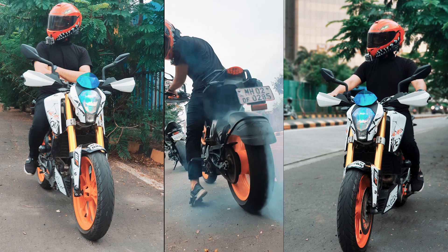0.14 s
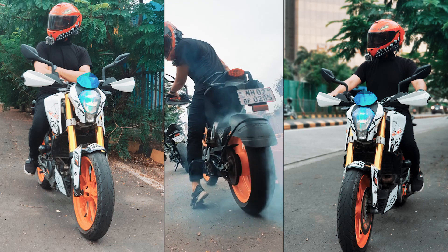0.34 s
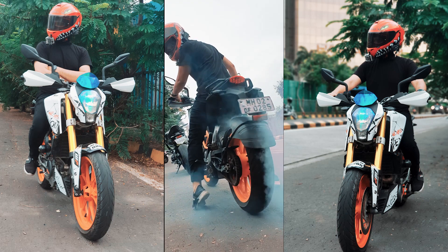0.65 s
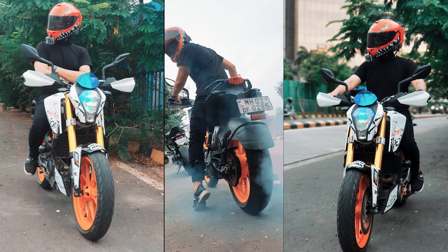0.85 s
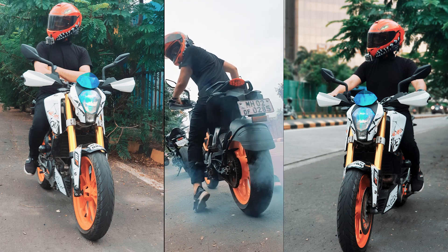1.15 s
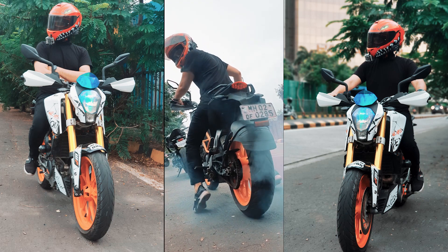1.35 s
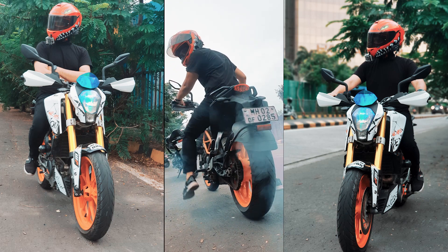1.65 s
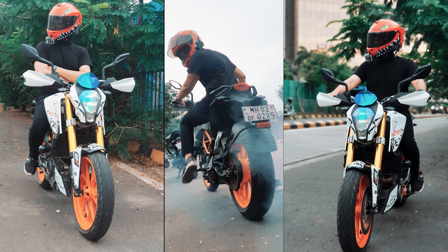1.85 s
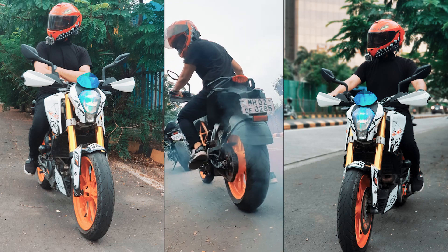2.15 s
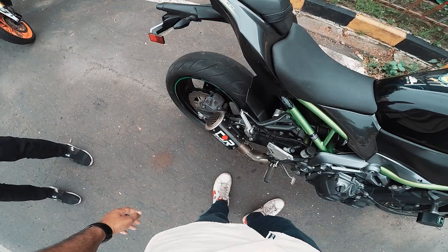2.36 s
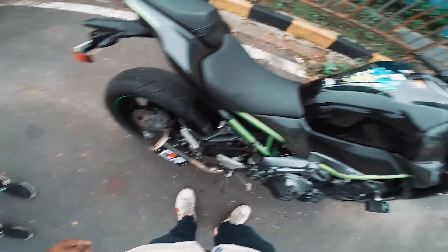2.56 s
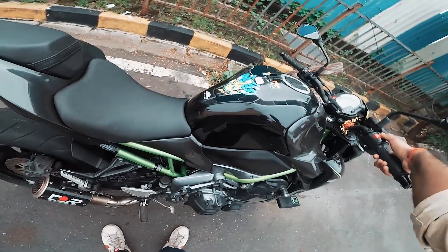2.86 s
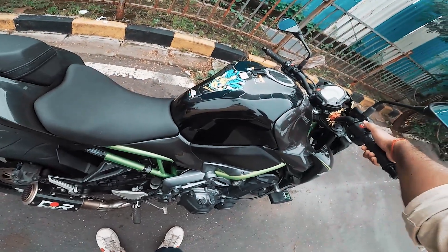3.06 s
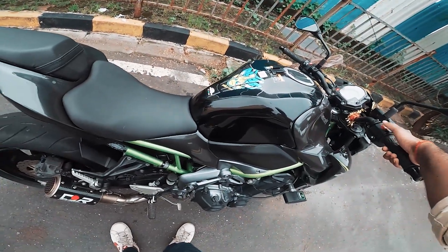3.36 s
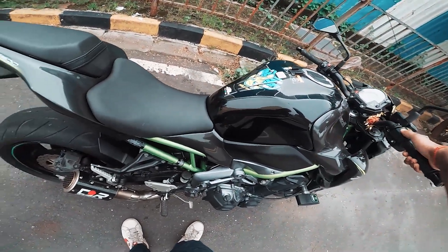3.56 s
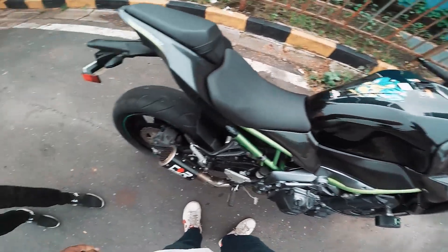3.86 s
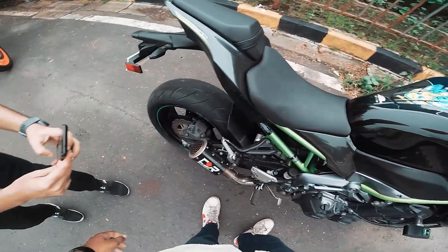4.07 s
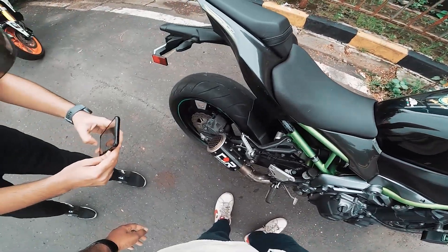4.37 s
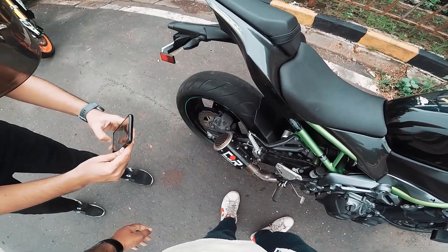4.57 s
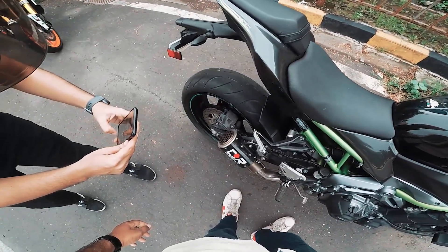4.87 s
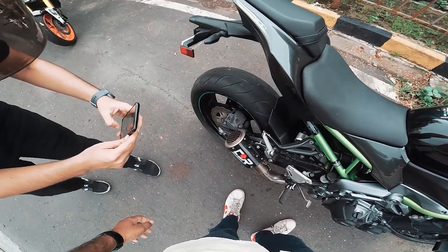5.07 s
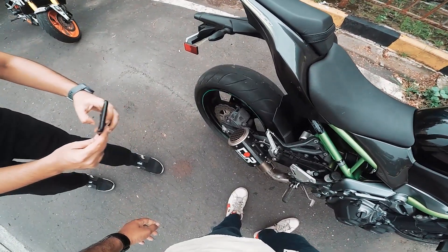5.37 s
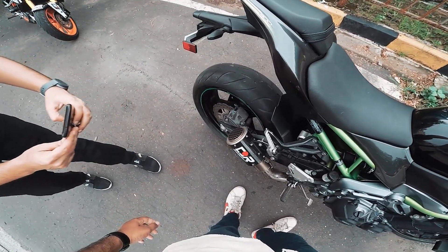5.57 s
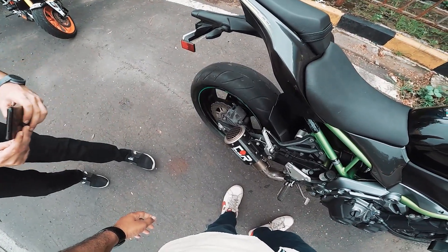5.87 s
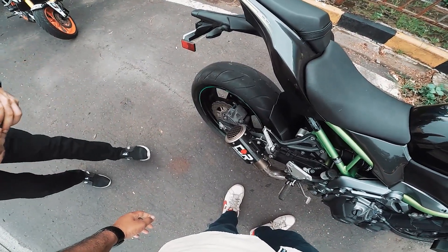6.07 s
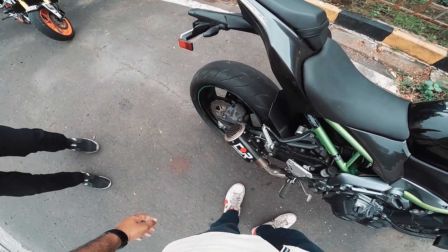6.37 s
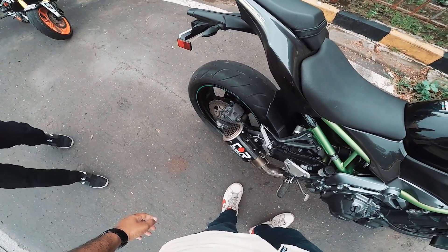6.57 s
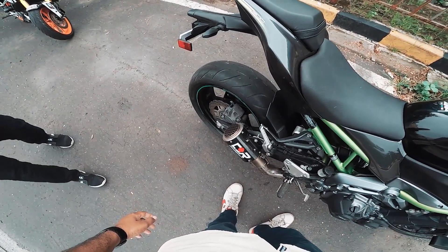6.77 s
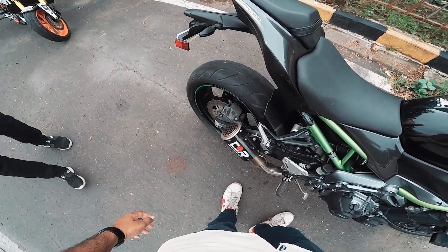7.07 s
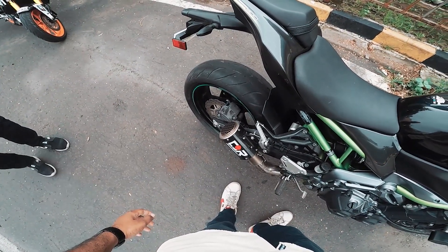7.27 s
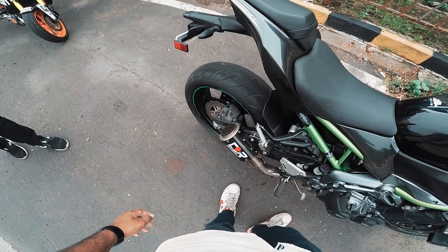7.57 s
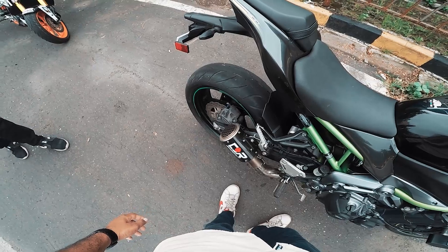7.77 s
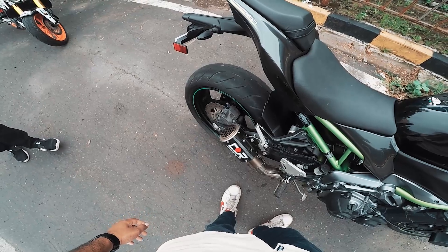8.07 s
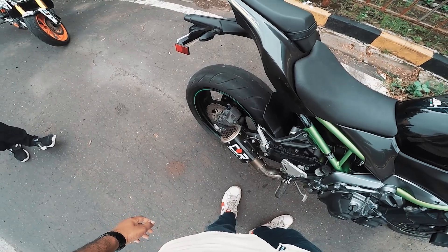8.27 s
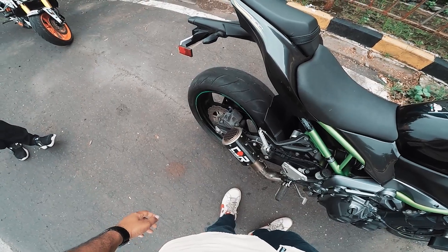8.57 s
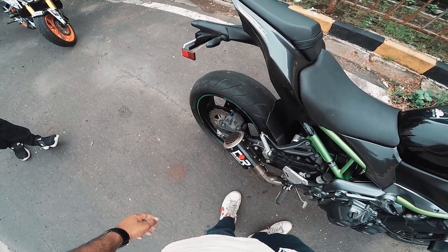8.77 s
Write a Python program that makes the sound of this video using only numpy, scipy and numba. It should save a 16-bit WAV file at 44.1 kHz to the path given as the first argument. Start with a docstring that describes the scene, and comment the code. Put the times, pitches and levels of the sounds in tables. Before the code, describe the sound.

Outdoors by a road with soft traffic, a single-cylinder motorcycle blares in a burnout with rough tyre scrub, pops once, slows into separate thuds and stops among a few clanks. An abrupt change to a close view brings switch clicks, a whining starter that labours, then a four-cylinder engine catching, idling unevenly and revving three times, each higher, coasting down between.

```python
"""By a road, two motorcycles are heard one after the other, with soft traffic noise behind each.
A single-cylinder bike spins its rear tyre in a burnout, runs down and stops with a few clanks.
Then, close up, a four-cylinder bike is switched on, cranked, idles unevenly and is revved three times, each higher.
Each firing is a pulse that rings an exhaust pipe; shaped noise adds tyre scrub, gas rasp and traffic.
Short pulses and bursts ring metal parts for the valves, the starter gears and the switches."""
import sys
import numpy as np
from scipy import signal
from scipy.fft import rfft, irfft
from scipy.io import wavfile
from scipy.ndimage import uniform_filter1d, minimum_filter1d
from numba import njit

SR = 44100
rng = np.random.default_rng(int(sys.argv[2]) if len(sys.argv) > 2 else 0)


def bounce(signal):
    """Save signal as a 16-bit WAV file at the path given by the first command-line argument."""
    frames = np.transpose(np.atleast_2d(signal))
    limited = np.clip(frames, -1, 1)
    pcm = np.round(limited * 32767).astype(np.int16)
    wavfile.write(sys.argv[1], SR, pcm)


N = 393372
T = np.arange(N) / SR  # time of every sample, in seconds


def undb(db):
    """Decibels to gain."""
    return 10 ** (np.asarray(db) / 20)


def look_up(x, table):
    """Read a two-column table at x, with straight lines between its rows."""
    return np.interp(x, *np.transpose(table))


def between(start, end, fade):
    """One from start to end, with short slopes just inside both ends."""
    return np.clip((T - start) / fade, 0, 1) * np.clip((end - T) / fade, 0, 1)


def bump(s, length):
    """A brief swell to one around a moment."""
    return np.exp(-((T - s) / length) ** 2)


def since(s):
    """Seconds since a moment, zero before it."""
    return np.maximum(T - s, 0)


def ramp(s, length):
    """Rises from zero at s to one."""
    return np.minimum(since(s) / length, 1)


def blend(a, b, share):
    """From a to b as the share goes from zero to one."""
    return a + (b - a) * share


def colour(x, points):
    """Ring x through a body with this (frequency, level) response; nothing sounds before it is struck."""
    hz, db = np.transpose(points)
    octave = np.log2(np.maximum(np.arange(4097) * SR / 8192, 1))
    below = np.maximum(np.log2(hz[0]) - octave, 0)
    above = np.maximum(octave - np.log2(hz[-1]), 0)
    # beyond the table the level falls 18 dB per octave
    level_db = np.interp(octave, np.log2(hz), db) - 18 * (below + above)
    # folding the cepstrum (the spectrum of the log level) puts the ringing after the blow
    cepstrum = irfft(np.log(undb(level_db)))
    response = irfft(np.exp(rfft(2 * cepstrum * (np.arange(8192) < 4096))))[:4096]
    response = response / np.linalg.norm(response)
    response = response.reshape((1,) * (x.ndim - 1) + (-1,))
    return signal.oaconvolve(x, response, axes=-1)[..., :N]


def steady(x, size=4000):
    """Even out the loudness by bringing the running rms (average strength) to about one."""
    power = np.mean(np.atleast_2d(x) ** 2, axis=0)
    power = uniform_filter1d(uniform_filter1d(power, size), size)
    return x / np.sqrt(np.abs(power) + 1e-4 * power.mean())


def noise(width):
    """Stereo noise; width is side over mid, and zero is the same at both ears."""
    mid, side = rng.standard_normal((2, N))
    return (mid + width * side * np.array([[1], [-1]])) / np.sqrt(1 + width ** 2)


def walk(rate):
    """Slow random wandering around zero, with a spread near one."""
    k = int(SR / rate)
    steps = np.repeat(rng.standard_normal(N // k + 1), k)
    return 1.3 * uniform_filter1d(steps, k)[:N]


def pan(db):
    """Left and right gains for a left minus right level."""
    return undb(np.array([[db], [-db]]) / 2)


def turns(rate, start):
    """Cycles counted from a starting moment."""
    return np.cumsum(rate * (T >= start)) / SR


def firings(cycle, scatter_db, jitter_s, pattern_db=(0,)):
    """One pulse a cycle, uneven in size and moment; the pattern gives successive pulses their own strength."""
    at = np.flatnonzero(np.diff(np.floor(cycle)) > 0)
    chance = rng.standard_normal((len(at), 2))
    size = undb((scatter_db + 0 * T)[at] * chance[:, 0] + np.resize(pattern_db, len(at)))
    shift = np.round((jitter_s + 0 * T)[at] * SR * chance[:, 1]).astype(int)
    return np.bincount(np.clip(at + shift, 0, N - 1), size, N)


def scatter(x, wet, t60):
    """Ground, kerb and bodywork return a short noisy tail, different at each ear; t60 is its 60 dB fall [s]."""
    t = T[:SR // 3]
    tail = rng.standard_normal((2, len(t))) * undb(-60 * t / t60)
    tail /= np.linalg.norm(tail, axis=1, keepdims=True)
    return x + wet * signal.oaconvolve(np.atleast_2d(x) * np.ones((2, 1)), tail, axes=1)[:, :N]


@njit
def lowpass(x, hz, damping):
    """Low-pass filter with a moving corner; less damping makes the corner ring more."""
    y, b, l = np.empty(len(x)), 0., 0.
    for i in range(len(x)):
        g = np.tan(np.pi * hz[i] / SR)
        v = (b + g * (x[i] + 1e-18 - l)) / (1 + g * (g + damping))
        y[i] = l + g * v
        b, l = 2 * v - b, 2 * y[i] - l
    return y


def road(spectrum):
    """Traffic noise: the rumble is alike at both ears, the hiss wide."""
    rumble = lowpass(rng.standard_normal(N), 500 + 0 * T, 1.2)
    side = rng.standard_normal(N)
    side = side - 1.16 * lowpass(side, 1500 + 0 * T, 1.0)
    wide_hiss = side * np.array([[1], [-1]])
    mix = noise(0) + 0.42 * rumble * walk(14) + 0.81 * wide_hiss
    return steady(colour(mix, spectrum), size=20000)


# loudness of the traffic: (time [s], level [dB])
TRAFFIC = [(1.7, -41.5), (2.1, -39), (2.42, -33.5), (2.72, -30.5), (2.95, -34), (4.06, -34.5), (6.3, -40)]
# tone of the road behind the first bike: (frequency [Hz], relative level [dB])
FAR_ROAD = [(18, -31), (30, -16), (80, -8), (424, -24), (521, -17.5), (624, -28.5), (1130, -23.5),
            (1610, -36), (2770, -34), (3150, -38), (14000, -68)]
# tone of the road behind the second bike: (frequency [Hz], relative level [dB])
NEAR_ROAD = [(18, -38), (30, -17), (117, -13), (156, -1), (363, -9), (521, -13.5), (608, -17.5),
             (1100, -22), (1570, -25), (2560, -34.5), (6150, -34.5), (14000, -53.5)]
CHANGE_S = 2.432  # the moment we move to the second bike


def traffic():
    """Traffic is steady noise in two tones, one behind each bike, that swells and fades."""
    near = between(CHANGE_S, 10, 0.0027)
    both = road(FAR_ROAD) * (1 - near) + road(NEAR_ROAD) * near
    return both * undb(look_up(T, TRAFFIC)) * pan(-2.7)


# latches, levers and switches:
# (time [s], blow level before the final trim [dB], ring to -60 dB [s], brightness [0 clank - 1 snap])
CLICKS = [(1.461, -26, 0.044, 0), (1.656, -19.5, 0.23, 0.05), (1.709, -23, 0.11, 0),
          (1.842, -27, 0.15, 0.12), (1.988, -28.5, 0.093, 0.13), (3.406, -35.5, 0.23, 0.67),
          (3.484, -6, 0.0097, 1), (3.486, -27.5, 0.19, 0.51), (3.717, -33.5, 0.24, 0.95),
          (3.741, -26.5, 0.11, 0.42), (4.079, -14.5, .04, 0.82), (4.396, -14, 0.071, 0.63),
          (5.752, -10.5, 0.016, 0.35), (5.789, -20, 0.2, 0.41), (6.58, -21.5, 0.09, 0.38),
          (7.466, -20, 0.028, 0.085)]
# tone of heavy metal parts: (frequency [Hz], relative level [dB])
CLANK = [(350, -79), (600, -27), (1030, -1.5), (1720, -11.5), (2340, -9), (4230, -15.5), (6420, -31.5),
         (15000, -39)]
# tone of small, bright switches: (frequency [Hz], relative level [dB])
SNAP = [(470, -48), (800, -13.5), (1750, -17.5), (2350, 0), (3320, -11), (3710, -2.5), (4190, -8),
        (6130, 2), (15000, -35.5)]


def clicks():
    """Short dying bursts of noise ring either heavy metal parts or small, bright switches."""
    clank, snap = np.zeros((2, N))
    for s, db, ring, bright in CLICKS:
        blow = undb(db - 60 * since(s) / ring) * (T >= s)
        share = np.clip(bright, 0, 1)
        clank = clank + (1 - share) * blow
        snap = snap + share * blow
    heavy = undb(-6.5) * colour(clank * noise(0.86), CLANK)
    bright_parts = undb(-1.0) * colour(snap * noise(0.69), SNAP)
    return heavy + bright_parts


# lone rings: a backfire, a soft bump, two cranking chuffs, a metal ping, then the throttle snapping shut:
# (time [s], level [dB], pitch [Hz], decay [cycles])
THUMPS = [(.443, -1.5, 420, 3), (2.665, -25, 105, 3), (4.29, -22, 150, 5), (4.3, -25, 54, 14),
          (4.807, -33, 3650, 90), (5.975, -16, 80, 1.5), (6.818, -15, 90, 1.5), (7.655, -16, 130, 1.5)]


def thumps():
    """Each blow rings a pipe or a metal part at one pitch that dies away."""
    out = 0
    for s, db, hz, decay in THUMPS:
        cycles = hz * since(s)
        out = out + undb(db) * np.sin(2 * np.pi * cycles) * np.exp(-cycles / decay)
    return out


# the burnout level holds while the tyre is driven, then falls steadily as the engine runs down
DRIVE_ENDS_S, DRIVE_FADE_S = 0.36, 0.022
# tone of the silencer: (frequency [Hz], relative level [dB])
SINGLE_PIPE = [(35, -18), (75, 2.5), (150, 3), (220, -7), (300, -0.5), (395, -6), (432, 8.5), (465, -2.5),
               (520, 2.5), (680, -16.5), (1200, -3.5), (3000, -23.5)]
SINGLE_DB, SINGLE_FALL_DB_PER_S = -13.5, 16.5
BARK_S, BARK_LENGTH_S, BARK_DB = 0.52, 0.05, 4.5  # the exhaust barks as the throttle shuts


def single_exhaust(rate, pulses, surge, driving, grab_db):
    """Firing pulses and gas noise ring the silencer, duller as the strokes slow down."""
    flow = pulses + .002 * surge * rng.standard_normal(N)
    boom = 1.8 * driving * lowpass(pulses, 150 + 0 * T, 4.9)  # long, full puffs while the tyre is driven
    flow = flow - lowpass(flow, 3.34 * rate, 0.81) * (1 - driving)  # coasting strokes move little gas
    flow = lowpass(flow, 60 + 11 * rate, 2.1)  # slow strokes are duller
    pipe = steady(scatter(colour(flow - boom, SINGLE_PIPE), 0.13, 0.8))
    fall_db = SINGLE_FALL_DB_PER_S * since(DRIVE_ENDS_S)
    return pipe * undb(SINGLE_DB - fall_db + BARK_DB * bump(BARK_S, BARK_LENGTH_S) + grab_db)


# tone of the rush of tyre and gas: (frequency [Hz], relative level [dB])
SCRUB = [(300, -1.5), (750, -3), (1030, -0.5), (1330, 1), (1600, -9), (2050, -3.5), (2500, -3.5),
         (3100, -10), (3900, -9), (4900, -17), (7500, -26.5), (15000, -35.5)]
SCRUB_DB, SCRUB_FALL_DB_PER_S = -12.5, 28.5


def tyre_scrub(pulses, surge, driving):
    """Rough noise from the tyre and gas surges with every power stroke, with cracks from the pulses."""
    crack = steady(scatter(pulses, 4, .22))
    rush = surge * undb(walk(40)) * noise(.8) * (.4 + .15 * driving)
    scrub = steady(colour(rush + crack, SCRUB))
    return scrub * undb(SCRUB_DB - SCRUB_FALL_DB_PER_S * since(DRIVE_ENDS_S)) * pan(-1.3)


# speed of the single cylinder: (time [s], firing rate [per s])
SINGLE_RATE = [(0.0, 81.08), (0.25, 82.79), (0.42, 77.83), (0.6, 66.14), (0.85, 48.61), (1.15, 29.67),
               (1.4, 16.73), (1.62, 6.0)]
# the tyre grabs and upsets the firing:
# (time [s], length [s], unevenness [0-1], exhaust change [dB])
GRABS = [(0.126, 0.039, 0.98, 0.5), (0.314, 0.035, 0.9, 1.5), (0.406, 0.04, 0.9, -3.0)]
SLIP_CYCLES = 0.03  # the slipping tyre makes the speed waver
STALL_S, STALL_FADE_S = 1.82, 0.49  # the last strokes die away
LEFT_LAG_SAMPLES = 4


def single():
    """Each power stroke of the slowing engine thuds in the silencer and drives the tyre's scrub."""
    rate = look_up(T, SINGLE_RATE)
    uneven = sum(depth * bump(s, length) for s, length, depth, _ in GRABS)
    grab_db = sum(db * bump(s, length) for s, length, _, db in GRABS)
    cycle = turns(rate, 0) + SLIP_CYCLES * walk(14)
    driving = between(-1, DRIVE_ENDS_S, DRIVE_FADE_S)
    pulses = firings(cycle, .8 + 2 * uneven, .0012 * np.clip(uneven, 0, 1) ** 2)
    surge = 1.2 + np.exp(-(cycle % 1) / .25)  # strongest just after each firing
    bike = single_exhaust(rate, pulses, surge, driving, grab_db) + tyre_scrub(pulses, surge, driving)
    left, right = bike * between(-1, STALL_S, STALL_FADE_S)
    return np.array([np.roll(left, LEFT_LAG_SAMPLES), right])


# the motor spins up to its free speed and labours against each compression
STARTER_ON_S, SPIN_UP_HZ_PER_S, FREE_MESH_HZ = 4.04, 7100, 1140
LABOUR_S, RECOVER_S = 0.055, 0.033
# compressions: (time [s], drop of the gear mesh [Hz])
COMPRESSIONS = [(4.329, 493.3), (4.469, 248)]
# the starter's gears bite: (start [s], end [s], level [dB], grind relative to the whine [ratio])
BITES = [(4.077, 4.168, -18.5, 0.9), (4.196, 4.32, -16.0, 0.23), (4.39, 4.426, -17.5, 1.35)]
BITE_ATTACK_S, BITE_RELEASE_DB_PER_S, BACKLASH_TEETH = 0.0088, 225.5, 0.018
SLACK_GRIND, SLACK_S = 1.46, 0.054  # between bites the teeth only rattle
# tone of the engine case: (frequency [Hz], relative level [dB])
STARTER_CASE = [(88, -40), (150, -20), (208, -5), (378, 1), (535, -9), (860, -11), (1010, -0.5),
                (1170, -11), (1295, 3), (1420, -9), (1800, -9), (2140, -6), (3450, -11.5), (3580, -1),
                (3800, -24), (4300, -16), (6810, -6), (7550, -17), (7676, -4.5), (7850, -10), (9270, -31.5),
                (15000, -54)]


def starter():
    """Gear teeth whine and chatter in the engine case, slowing as a piston compresses."""
    mesh = np.minimum(SPIN_UP_HZ_PER_S * since(STARTER_ON_S), FREE_MESH_HZ)
    for s, drop in COMPRESSIONS:
        mesh = mesh - drop * bump(s, np.where(T < s, LABOUR_S, RECOVER_S))
    teeth = firings(turns(mesh, STARTER_ON_S) + BACKLASH_TEETH * walk(260), 2.5, .00001)
    teeth = teeth - 0.56 * lowpass(teeth, 2500 + 0 * T, 3.2)  # hard contacts favour the upper partials
    whine = steady(scatter(teeth, 1, 0.059))
    level, grind = 0, 0
    for start, end, db, share in BITES:
        bite = ramp(start, BITE_ATTACK_S)
        level = blend(level, undb(db - BITE_RELEASE_DB_PER_S * since(end)), bite)
        grind = blend(grind, blend(share, SLACK_GRIND, ramp(end, SLACK_S)), bite)
    return steady(colour(whine + grind * noise(0.49), STARTER_CASE)) * level * pan(-3.3)


# the cold idle hunts, climbing through each run of strong firings and sagging after it
IDLE_RATE, SAG_S = 30.55, 0.071  # rate in firings per s
# surges of the idle: (start [s], end [s], extra firing rate [per s])
SURGES = [(4.43, 4.57, 13.9), (4.71, 4.93, 8.5), (5.07, 5.25, 7.9), (5.33, 5.49, 8.8), (5.52, 5.72, 7.1)]
# throttle blips: (opens [s], peaks [s], peak firing rate [per s], coasting time constant [s],
# rasp at the peak [dB], coasting rasp at 100 firings per s [dB], exhaust just after [dB], exhaust settled [dB])
BLIPS = [(5.726, 5.978, 122.3, 0.53, -30.0, -36, -8.5, -16.0),
         (6.534, 6.825, 181.4, 0.7, -23.5, -38, -7, -12),
         (7.406, 7.66, 223.2, 0.774, -18, -43.0, -4, -17.0)]
CLIMB_SHAPE, TOP_ROUND_S = 1.39, 0.017


def four_speed():
    """Firings per second: a hunting idle; each blip pulls the speed up, then friction lets it decay."""
    rate = IDLE_RATE
    for start, end, extra in SURGES:
        rate = rate + np.interp(T, [start, end, end + SAG_S], [0, extra, 0])
    for opens, peaks, top, coast_s, *_ in BLIPS:
        climb = np.sin(np.pi / 2 * ramp(opens, peaks - opens)) ** CLIMB_SHAPE
        coasting_s = np.hypot(since(peaks), TOP_ROUND_S) - TOP_ROUND_S  # rounds the peak
        coast = np.exp(-coasting_s / coast_s)
        before = np.interp(opens, T, rate)
        rate = np.where(T < opens, rate, blend(before, top, climb) * coast)
    return rate


IDLE_DB, IDLE_RASP_DB, IDLE_LOAD = -13, -37, 0.5
SURGE_DB, SURGE_LOAD, SURGE_FADE_S = 4, 0.17, 0.038
OPEN_DB, OPEN_RASP_DB_PER_OCTAVE = -9, 2.5
COAST_FALL_DB_PER_S, COAST_RASP_DB_PER_OCTAVE = 22, 13.5
THROTTLE_LAG_S, THROTTLE_OPEN_S = 0.008, 0.022
THROTTLE_LEAD_S, THROTTLE_SHUT_S = 0.022, 0.0099  # the throttle shuts just before the speed peaks
# how hard the engine works, throttle open: (firing rate [per s], load [0 coasting - 1 full])
OPEN_LOAD = [(110, 0.94), (220, 0.26)]
# the same, throttle shut (it fires again near idle): (firing rate [per s], load [0 coasting - 1 full])
SHUT_LOAD = [(42, 0.52), (70, 0.014), (130, 0.02), (190, 0.39)]


def four_effort(rate):
    """Load, exhaust dB and rasp dB as the engine passes from idle to open throttle to coasting."""
    surge = sum(between(start, end + SURGE_FADE_S, SURGE_FADE_S) for start, end, _ in SURGES)
    effort = np.array([IDLE_LOAD + SURGE_LOAD * surge, IDLE_DB + SURGE_DB * surge, IDLE_RASP_DB + 0 * T])
    open_load, shut_load = look_up(rate, OPEN_LOAD), look_up(rate, SHUT_LOAD)
    for opens, peaks, top, _, rasp_db, coast_rasp_db, after_db, settled_db in BLIPS:
        open_rasp_db = rasp_db + OPEN_RASP_DB_PER_OCTAVE * np.log2(rate / top)
        pulling = np.array([open_load, OPEN_DB + 0 * T, open_rasp_db])
        shut_db = np.maximum(after_db - COAST_FALL_DB_PER_S * since(peaks), settled_db)
        shut_rasp_db = coast_rasp_db + COAST_RASP_DB_PER_OCTAVE * np.log2(rate / 100)
        coasting = np.array([shut_load, shut_db, shut_rasp_db])
        effort = blend(effort, pulling, ramp(opens + THROTTLE_LAG_S, THROTTLE_OPEN_S))
        effort = blend(effort, coasting, ramp(peaks - THROTTLE_LEAD_S, THROTTLE_SHUT_S))
    return effort


# tone of the valve train: (frequency [Hz], relative level [dB])
VALVES = [(600, -15.5), (1500, 2), (2500, 6.5), (3400, 4.5), (3900, 1), (5200, -0.5), (6400, 2),
          (7500, -1.5), (8500, -11), (10000, -15), (11500, -43), (14000, -27), (15500, -38)]
# valve clatter changes with engine speed: (firing rate [per s], level [dB])
VALVE_LEVEL = [(35, -38), (55, -47), (110, -41), (220, -35)]


def four_valves(rate, cycle):
    """Inlet and exhaust valves seat in turn, two taps a firing, ringing the valve train."""
    taps = steady(scatter(firings(2 * cycle, 6.5, .0008), 1.8, 0.026))
    clatter = steady(colour(0.78 * taps + noise(0.57), VALVES))
    return clatter * undb(look_up(rate, VALVE_LEVEL))


# tone of the rasp at the pipe's outlet: (frequency [Hz], relative level [dB])
RASP = [(350, 5.5), (520, 6.5), (750, -0.5), (1050, -1.5), (1170, -7.5), (1300, 1.5), (1450, -15.5),
        (1700, -3.5), (2300, -7.5), (3200, -18.5), (4300, -15), (6000, -28), (12000, -51)]
GAS_HISS, GAS_HISS_LUMPY = 1, 0.66  # loose gas noise in the rasp, and its extra share at low speed


def four_rasp(cycle, pulses, load, lumpy):
    """Sharp pulses and puffs of gas hiss at the pipe's outlet."""
    puff = np.exp(-(cycle % 1) / .15)
    shock = steady(scatter(pulses, .45, .02)) * (.5 + (.4 + 1.6 * load) * (1 - lumpy))
    hiss = (GAS_HISS + GAS_HISS_LUMPY * lumpy) * (1 - .5 * load + puff) * noise(0.87)
    return steady(colour(shock + hiss, RASP))


# tone of the exhaust pipe: (frequency [Hz], relative level [dB])
FOUR_PIPE = [(25, -43), (50, 4.5), (75, -5.5), (125, -5), (178, 7), (220, 1.5), (270, 8), (330, 5),
             (420, -3), (560, -9), (700, -21), (1100, -43.5)]
# brief dips in the exhaust, from weak firings or from the throttle being cut: (time [s], length [s], depth
# [dB])
EXHAUST_DIPS = [(4.592, 0.016, 7), (4.69, 0.032, 4.5), (4.947, 0.008, 9), (5.049, 0.017, 5), (5.273, .015, 5.5),
                (5.506, 0.015, 5), (5.958, 0.0053, 8), (6.805, 0.0052, 10), (7.248, 0.0059, 6),
                (7.365, 0.019, 3.5), (7.653, 0.013, 11)]


def four_exhaust(rate, cycle, pulses, load, lumpy, pipe_db):
    """Puffs ring the pipe, sharp under load and round when coasting, with a burble of late, weak burns."""
    corner_hz = (1.21 * rate) ** (1 - load) * (380 + 1.7 * rate) ** load  # a coasting puff lasts the whole stroke
    burble = firings(cycle, 3, .003) * (.008 + .08 * lumpy)
    burble = burble + .0035 * lumpy * rng.standard_normal(N)
    burble = burble - lowpass(burble, 120 + 0 * T, 0.3)
    flow = lowpass(pulses, corner_hz, 1.08) + lowpass(burble, 420 + 0 * T, 0.73)
    flow = flow - lowpass(flow, 0.07 * rate, 1.0)  # the steady outflow is silent
    dip_db = -sum(db * bump(s, length) for s, length, db in EXHAUST_DIPS)
    pipe = steady(colour(flow, FOUR_PIPE)) * undb(pipe_db) * undb(dip_db)
    return scatter(pipe, .06, .2)


CATCH_S = 4.434  # the engine starts to fire
WOBBLE_CYCLES, FIRING_SCATTER_DB = 0.012, 0.5  # the crank never turns quite evenly


def four():
    """Four cylinders fire in turn, each with its own strength, and drive the exhaust, rasp and valves."""
    rate = four_speed()
    load, pipe_db, rasp_db = four_effort(rate)
    load = np.clip(load, 0, 1)
    cycle = turns(rate, CATCH_S) + WOBBLE_CYCLES * walk(45)
    lumpy = np.clip(75 / rate, 0, 1) ** 2  # combustion evens out with speed
    pulses = firings(cycle, FIRING_SCATTER_DB + 1.0 * lumpy, .00002, pattern_db=(.3, -.3, .1, -.1))
    pipe = four_exhaust(rate, cycle, pulses, load, lumpy, pipe_db) * pan(-1.75)
    rasp = four_rasp(cycle, pulses, load, lumpy) * undb(rasp_db) * pan(-0.65)
    return (pipe + rasp + four_valves(rate, cycle)) * between(4.45, 10, 0.011)


def scene():
    """The burnout first, then the kerbside with the second bike."""
    return traffic() + clicks() + thumps() + single() + starter() + four()


TOP_HZ = 15650


def record(dry):
    """A fast limiter holds the peaks; everything above the top frequency is cut."""
    gain = np.minimum(1, .92 / np.maximum(np.abs(dry).max(axis=0), 1e-6))
    gain = uniform_filter1d(minimum_filter1d(gain, size=300), size=300)
    top_cut = signal.ellip(10, .1, 80, TOP_HZ, fs=SR, output="sos")
    return signal.sosfilt(top_cut, dry * gain)


dry = scene()
out = record(dry)
bounce(out)
```